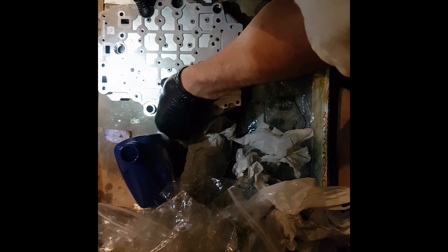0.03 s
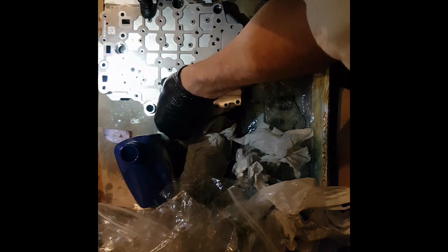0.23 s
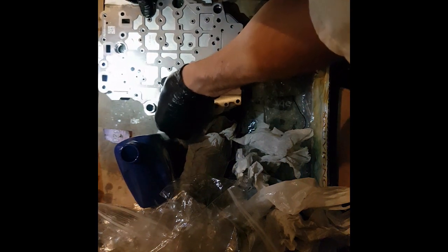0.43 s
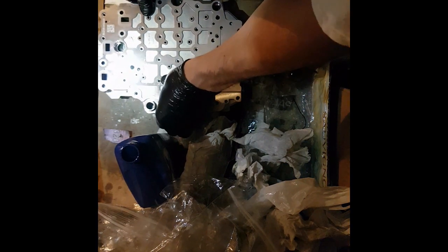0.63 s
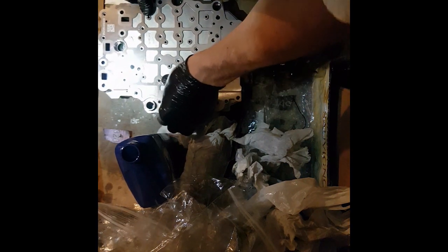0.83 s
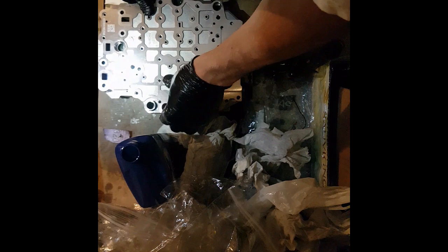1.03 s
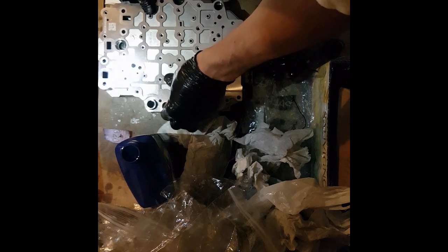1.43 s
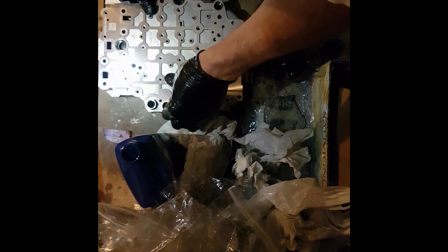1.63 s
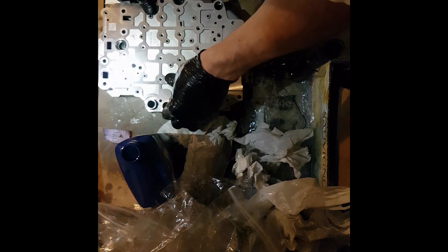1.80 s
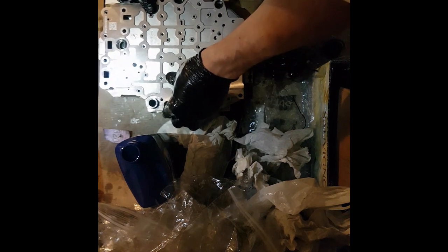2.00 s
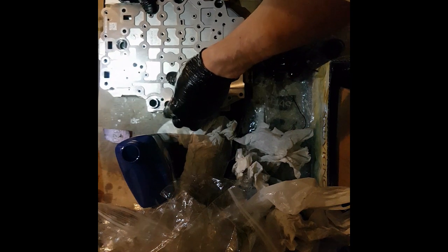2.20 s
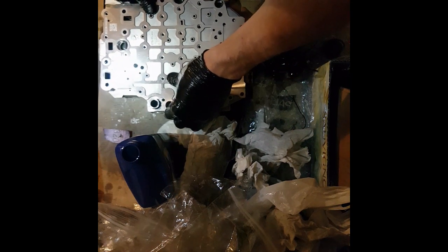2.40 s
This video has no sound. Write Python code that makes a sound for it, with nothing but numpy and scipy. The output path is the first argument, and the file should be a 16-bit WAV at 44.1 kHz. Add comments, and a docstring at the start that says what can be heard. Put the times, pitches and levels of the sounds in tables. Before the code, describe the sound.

Close by in a small garage, a metal casting gives with a solid clack, then snaps sharply about a second later. Faint glove rubbing, small ticks and soft knocks on the bench surround the two hits, above a low rumble.

```python
"""A gloved hand works a cast metal part on a garage bench, close by, over a low rumble.
After a few light ticks and rubs the part gives at 0.24 s: a heavy clack excites the casting's damped
modes and shakes the bench. More ticks and glove friction lead to one sharp snap at 1.32 s, which rings
a small steel piece. Soft knocks follow, a faint hiss rises, and the last ticks and rubs die away.
Throughout, nearby surfaces reflect each impact and the small room reverberates."""
import sys
import numpy as np
from scipy import signal
from scipy.fft import rfft, irfft, next_fast_len
from scipy.io import wavfile
from scipy.ndimage import uniform_filter1d, map_coordinates

SR = 44100
rng = np.random.default_rng(int(sys.argv[2]) if len(sys.argv) > 2 else 0)


def store_wav(level_fs):
    """Save 16-bit WAV to argv[1]."""
    pcm = np.round(np.clip(np.atleast_2d(level_fs), -1, 1) * 32767)
    wavfile.write(sys.argv[1], SR, pcm.T.astype(np.int16))


N = 112454

# spectra of the room's air, a faint drone and a faint hiss: frequency_hz, level_db
AIR_COLOUR = [(15, -24.5), (25, -6.5), (99, 1.5), (169, -10.5), (509, -14), (614, -14.5), (703, -16.5),
              (970, -20), (1750, -19.5), (1950, -20.5), (4750, -31.5), (7300, -39.5), (15500, -34.5)]
DRONE_COLOUR = [(200, -40.5), (270, -6), (305, -6), (345, -10), (420, -43), (2000, -93)]
HISS_COLOUR = [(300, -0.5), (2000, -4.5), (5000, -1.5), (6000, 1), (7000, -3.5), (9000, -3.5),
               (10700, -1.5), (11250, 2.5), (11800, -1), (15500, -4)]
# course of the hiss: time_s, level_db
HISS_LEVEL = [(0, -75), (1.72, -82), (1.79, -73.5), (1.86, -67), (2.15, -71), (2.299, -70.5), (2.55, -74)]
# left-right coherence of diffuse sound: frequency_hz, coherence_ratio
COHERENCE = [(50, 1), (250, 0.44), (700, 0), (2000, 0), (15000, 0)]
# reverberation time of the room: frequency_hz, t60_s
ROOM_T60 = [(100, .42), (600, .43), (2000, .39), (5500, .39), (9000, .27), (15000, .22)]
# stereo balance of the reverberation: frequency_hz, left_over_right_db
ROOM_BALANCE = [(100, 2.5), (700, -3.5), (1500, 0), (8000, -1), (14000, 3)]
# reflections from nearby surfaces: delay_s, left_db, right_db
ECHOES = [(.0037, -47.5, -0.5), (.0072, -58.5, -10.5), (.0145, -8, -11.5)]
# acoustic shadow on the right channel's direct sound: frequency_hz, gain_db
RIGHT_SHADOW = [(80, 2), (400, 2), (1300, -18), (4000, -22.5), (15000, -23)]

# strokes of the glove over the casting: start_s, length_s, level_db, squeak_hz, squeak_db
RUBS = [(0.023, .018, -61.5, 1810, 4), (.06, 0.077, -56, 1250, -12), (0.538, 0.21, -56, 1740, -18),
        (0.957, .12, -60, 1600, -6), (1.128, 0.082, -65, 1990, -10.5), (2.059, 0.13, -65.5, 587, -1),
        (2.116, 0.1, -60.5, 2180, -11), (2.38, 0.17, -68.5, 1570, -6)]
# pushes that shake the bench: start_s, level_db, rise_s, t60_s
THUMPS = [(0.24, -23.5, 0.0056, 0.041), (0.2587, -24, 0.005, 0.2), (0.301, -45, 0.025, 0.61),
          (.612, -46, 0.0058, 0.23), (0.701, -50, 0.0062, 0.26), (1.151, -51, 0.0073, 0.19),
          (1.376, -42, 0.0047, 0.24), (1.812, -42.5, 0.0073, 0.13), (2.091, -50, 0.011, 0.48),
          (2.125, -43, 0.0034, 0.092), (2.442, -44, 0.026, 0.18)]
# impacts: start_s, level_db, rise_s, t60_s, treble_db
TICKS = [(.0295, -54, 0.0012, 0.021, -3), (.079, -57, 0.009, .08, 1), (.0985, -45.5, .001, 0.021, 2),
         (.445, -41.5, .015, .12, -6), (.615, -44.5, 0.00118, 0.036, -14), (.729, -55, 0.00073, .03, 15),
         (.794, -49, 0.0016, 0.023, -7), (.928, -46.5, 0.0011, 0.052, -1.5),
         (1.143, -45.5, .003, 0.065, -10.5), (1.213, -51.5, 0.00098, .03, 6.5),
         (1.551, -56, .001, 0.033, 4), (1.967, -49.5, .002, 0.043, 14), (2.149, -42, 0.01, 0.076, -12.5),
         (2.421, -45.5, 0.0017, 0.069, 0.5)]  # metal lightly on metal
KNOCKS = [(1.378, -40.5, .006, 0.11, -8.5), (1.804, -45, 0.0023, 0.033, -9),
          (1.8125, -40, 0.0016, 0.08, 25)]  # the part on the bench
SNAPS = [(1.3228, -7.5, 0.00013, 0.0055, -2.5), (1.3262, -18, 0.00022, 0.036, 4.5)]  # snap and rebound
CLACKS = [(.2355, -18.5, 0.0017, 0.048, 0), (.246, -5, 0.0018, 0.011, 22), (.2495, -9, 0.0018, 0.043, -1)]  # first slip, hard contact, seating
# spectra of the friction and of each kind of impact: frequency_hz, level_db
RUB_COLOUR = [(150, 9), (350, -16.5), (620, 1), (950, -4), (1700, -3), (3000, -8.5), (5000, -13),
              (8000, -20.5), (15000, -22)]
TICK_COLOUR = [(100, 0.5), (350, -5), (520, 2), (650, 2), (1000, -8.5), (1700, -3), (3000, -6),
               (5000, -7.5), (8000, -17), (15000, -12.5)]
KNOCK_COLOUR = [(50, -13.5), (140, -0.5), (290, 3.5), (400, -11.5), (620, 4), (780, -4.5), (900, -13),
                (1250, -14.5), (1600, 0), (1800, -19), (2200, -15.5), (2800, -36), (6000, -54),
                (15000, -58)]
SNAP_COLOUR = [(100, -25.5), (380, -16.5), (640, 0), (900, -2.5), (1400, -6), (2300, -1.5), (3400, -4),
               (4600, -5.5), (5300, -2), (6300, -5), (7200, -8), (10500, -9.5), (13300, -3), (15500, -1.5)]
CLACK_COLOUR = [(60, -30), (180, 1), (260, -23), (340, -7.5), (410, -1.5), (520, 3), (850, -2),
                (1120, -6.5), (1500, -1.5), (3300, -5.5), (5000, -12), (9000, -23), (15000, -24.5)]
# modes of the bench: pitch_hz, level_db
BENCH_MODES = [(36, -30.5), (72, -1), (82, 0), (114, -3.5), (124, 0), (138, 1), (182, -12.5), (330, -18)]
# modes of the hand-damped casting and of the steel piece that snaps: pitch_hz, level_db, t60_s
CASTING_MODES = [(326.6, -0.5, 0.05), (584, -12, 0.15), (690, -3, 0.2), (876, 11.5, 0.099),
                 (1460, -0.5, 0.045), (1430, -4.5, 0.12), (2000, -1.5, .1), (2910, -15, .06),
                 (3230, -3, 0.046), (4860, -13.5, .05), (6320, -8.5, 0.034), (6860, -6.5, 0.028)]
STEEL_MODES = [(850, 4.5, 0.11), (1150, -9, 0.077), (2210, 7, .035), (2333, -11, 0.054), (2572, 7.5, .04),
               (3526, 4.5, 0.014), (5150, -2, 0.025), (5000, -1.5, 0.018), (6090, 6, .04),
               (7680, 10.5, .03), (9000, 5, 0.0067), (12200, -0.5, 0.022), (13700, 1, 0.0086)]

AIR_DB, DRONE_DB = -62, -70.5
CHANNEL_LAG_S, TOP_HZ = .0003, 15800
RING_SHARE = .2  # share of the ringing that feeds the room


def amp(db):
    """Amplitude ratio: tenfold for every 20 decibels."""
    return 10 ** (np.asarray(db) / 20)


def unit(x):
    """Normalisation to rms 1."""
    return x / np.sqrt(np.mean(x ** 2) + 1e-20)


def along(points, hz):
    """Interpolation of (frequency_hz, value) points on a logarithmic frequency axis."""
    frequencies, values = np.transpose(points)
    return np.interp(np.log(hz + 1), np.log(frequencies + 1), values)


def filtered(x, response):
    """Linear filtering: the spectrum is multiplied by a complex frequency response."""
    size = next_fast_len(N + SR // 2)
    return irfft(rfft(x, size) * response(np.fft.rfftfreq(size, 1 / SR)), size)[..., :N]


def minimum_phase(colour, treble_db, size=4096):
    """Folding the cepstrum gives a causal, unit-energy response for a colour with a treble shelf."""
    hz = np.fft.rfftfreq(size, 1 / SR)
    shelf_db = treble_db * hz ** 2 / (hz ** 2 + 4000 ** 2)
    cepstrum = irfft(np.log(amp(along(colour, hz) + shelf_db)))
    cepstrum[1:size // 2] *= 2
    cepstrum[size // 2 + 1:] = 0
    response = irfft(np.exp(rfft(cepstrum)))
    return response / np.linalg.norm(response)


def diffuse(colour):
    """A diffuse field: stereo noise of rms 1, coherent in the bass and incoherent in the treble."""
    def mid_and_side(hz):
        angle = np.arccos(np.clip(along(COHERENCE, hz), -1, 1)) / 2
        return amp(along(colour, hz)) * [np.cos(angle), np.sin(angle)]
    mid, side = filtered(rng.standard_normal((2, N)), mid_and_side)
    return unit(np.array([mid + side, mid - side]))


def wobble(rate_hz):
    """Random modulation: a spline through rate_hz random knots a second."""
    knots = rng.standard_normal(int(N * rate_hz / SR) + 4)
    return map_coordinates(knots, [np.arange(N) * rate_hz / SR])


def envelope(start, rise, t60, size=N):
    """Damping: exponential decay after a quick rise."""
    age = np.maximum(np.arange(size) / SR - start, 0)
    return (1 - np.exp(-age / rise)) * amp(-60 * age / t60)


def background(waver_db):
    """Diffuse noises superpose: steady air and drone, a wavering rumble, a faint hiss that rises late."""
    hiss = amp(np.interp(np.arange(N) / SR, *np.transpose(HISS_LEVEL))) * diffuse(HISS_COLOUR)
    air = amp(AIR_DB) * diffuse(AIR_COLOUR) * amp([[-.7], [.7]])
    rumble = filtered(air, lambda hz: 1 / (1 + (hz / 200) ** 2))
    waver = (amp(waver_db * wobble(rate_hz=17)) - 1) * rumble
    drone = amp(DRONE_DB) * diffuse(DRONE_COLOUR)
    return air + waver + drone + hiss * amp([[-1.5], [1.5]])


def room_tail(x, treble_db):
    """Reverberation: each band stores the sound's energy and loses it at its own rate."""
    hz, t, spectrum = signal.stft(x, SR, nperseg=256)
    decay = amp(-120 * t / along(ROOM_T60, hz)[:, None]) * (1 - np.exp(-t / 0.0038))
    decay /= decay.sum(1, keepdims=True)
    energy = signal.fftconvolve(np.abs(spectrum) ** 2, decay, axes=1)[:, :len(t)]
    noise = signal.stft(diffuse([(100, 0.0035), (15000, 0.00089)]), nperseg=256)[2]
    gain = np.sqrt(np.abs(energy)) * amp(along([(3000, 0), (15000, treble_db)], hz))[:, None]
    tail = signal.istft(gain * noise / np.std(noise), nperseg=256)[1]
    return np.pad(tail, ((0, 0), (128, 0)))[:, :N]  # the tail arrives 3 ms late


def garage(sound, room_db, room_treble_db, echo_db, right_db):
    """Multipath propagation: direct sound from the left, early reflections, then reverberation."""
    def early_paths(hz):
        delay = lambda seconds: np.exp(-2j * np.pi * hz * seconds)
        shadowed = amp(along(RIGHT_SHADOW, hz) + right_db) * delay(CHANNEL_LAG_S)
        direct = np.array([np.ones(len(hz)), shadowed])
        echoes = sum(np.array([amp(left) * delay(lag + CHANNEL_LAG_S), amp(right) * delay(lag)])
                     for lag, left, right in ECHOES)
        return direct + amp(echo_db) * echoes / (1 + 1j * hz / 6000)  # echoes lose treble
    impacts, ringing = sound
    early = filtered(impacts + ringing, early_paths)
    tail = room_tail(impacts + RING_SHARE * ringing, room_treble_db)
    tail = filtered(tail, lambda hz: amp(along(ROOM_BALANCE, hz) * np.array([[.5], [-.5]])))
    return early + amp(room_db) * tail


def glove(grain_db, squeak_octaves):
    """Sliding friction: grainy noise and a narrow squeak band swell and fade with each stroke."""
    t, out = np.arange(N) / SR, np.zeros((2, N))
    friction, slips = diffuse(RUB_COLOUR), diffuse([(100, 0), (15000, 0)])
    for start, length, db, squeak_hz, squeak_db in RUBS:
        band = lambda hz: np.exp(-.5 * (np.log2((hz + 1) / squeak_hz) / squeak_octaves) ** 2)
        squeak = unit(filtered(slips, band))
        stroke = np.sin(np.pi * np.clip((t - start) / length, 0, 1))
        out += amp(db) * stroke * (friction + amp(squeak_db) * squeak)
    return out * unit(amp(grain_db * wobble(rate_hz=180)))


def bench(detune=0.0087):
    """Free vibration: each push sets the bench's low modes swinging, and damping stills them."""
    t, out = np.arange(N) / SR, np.zeros(N)
    for start, db, rise, t60 in THUMPS:
        swing = sum(amp(level) * np.sin(2 * np.pi * hz * (1 + detune * rng.standard_normal()) * (t - start))
                    for hz, level in BENCH_MODES)
        out -= amp(db) * envelope(start, rise, t60) * unit(swing)
    return out * amp([[-2.2], [1.8]]) + amp(-16) * room_tail(out, treble_db=0)


def burst(rise, t60, scatter, size=8192):
    """Broadband excitation: one hard impact plus a share of scattered micro-impacts, whitened."""
    share = np.clip(scatter, .05, 1)
    shape = envelope(0, rise, t60, size)
    force = np.sqrt(share / size) * unit(shape * rng.standard_normal(size))
    force[int(rise * SR)] += np.sqrt(1 - share)
    spectrum = rfft(force, 2 * size)
    smooth_power = np.abs(uniform_filter1d(np.abs(spectrum) ** 2, size=41))
    whitened = irfft(spectrum / np.sqrt(smooth_power + 1e-12))[:size]
    return unit(whitened) * np.sqrt(np.mean(shape ** 2))


def contacts(rows, colour, modes, scatter):
    """Modal response: coloured bursts drive damped resonances; returns (impacts, ringing)."""
    impacts, t = np.zeros(N + SR), np.arange(SR // 2) / SR
    for start, db, rise, t60, treble_db in rows:
        hit = signal.fftconvolve(burst(rise, t60, scatter), minimum_phase(colour, treble_db))
        impacts[int(start * SR):][:len(hit)] += amp(db) * hit
    # scaled so that db is each mode's gain at resonance
    ring = sum(amp(db - 60 * t / t60) * np.cos(2 * np.pi * hz * t) * 2 * np.log(1000) / (t60 * SR)
               for hz, db, t60 in modes)
    return np.array([impacts[:N], signal.fftconvolve(impacts, ring)[:N]])


def taps():
    """Weak impacts: metal ticks and dull knocks on the bench lightly excite the casting's modes."""
    ticks = contacts(TICKS, TICK_COLOUR, CASTING_MODES, scatter=0.95)
    knocks = contacts(KNOCKS, KNOCK_COLOUR, CASTING_MODES, scatter=.6)
    return garage(ticks + knocks, room_db=-9, room_treble_db=3.5, echo_db=-4.5, right_db=1)


def snap():
    """A brief contact has a wide spectrum: the snap and its rebound ring the steel's high modes."""
    sound = contacts(SNAPS, SNAP_COLOUR, STEEL_MODES, scatter=0.68)
    return garage(sound, room_db=-7, room_treble_db=-2.5, echo_db=-3.5, right_db=-5)


def clack():
    """Impact excitation: the casting slips, strikes and seats, and the hand damps its ringing."""
    sound = contacts(CLACKS, CLACK_COLOUR, CASTING_MODES, scatter=0.78)
    return garage(sound, room_db=-9, room_treble_db=1, echo_db=-3, right_db=-4.5)


def scene():
    """Superposition: the pressures of the handling sounds and the background add."""
    handling = clack() + snap() + taps() + bench() + glove(grain_db=2.5, squeak_octaves=0.13)
    return handling + background(waver_db=1.98)


def record(dry):
    """Band limiting: the response falls to zero across 300 Hz centred on TOP_HZ."""
    return filtered(dry, lambda hz: np.clip((TOP_HZ - hz) / 300 + .5, 0, 1))


dry = scene()
out = record(dry)
store_wav(out)
```